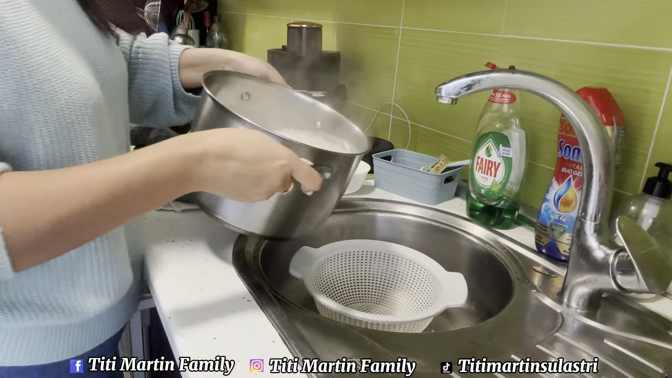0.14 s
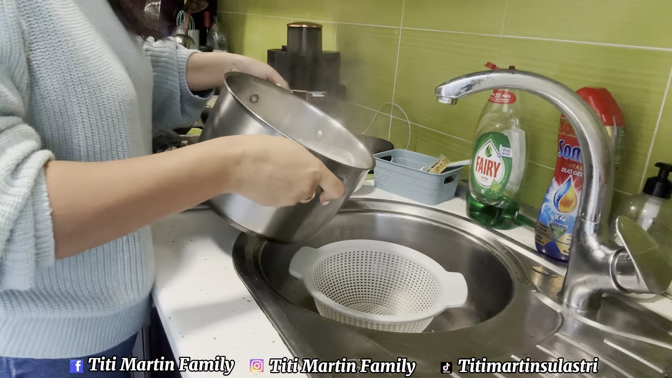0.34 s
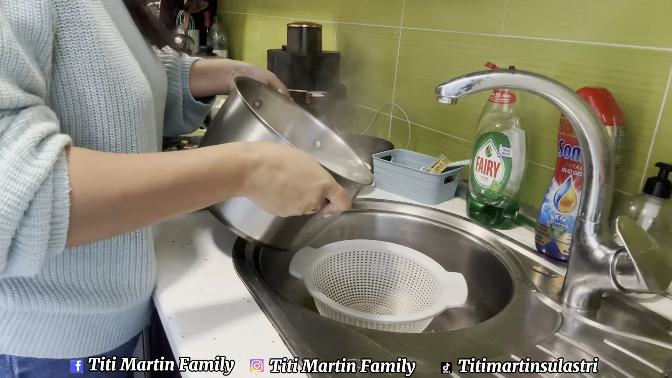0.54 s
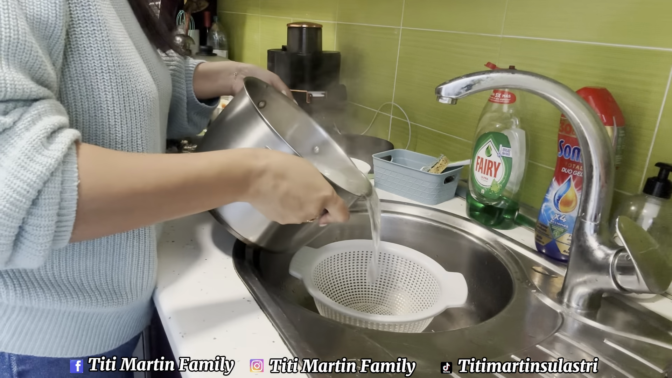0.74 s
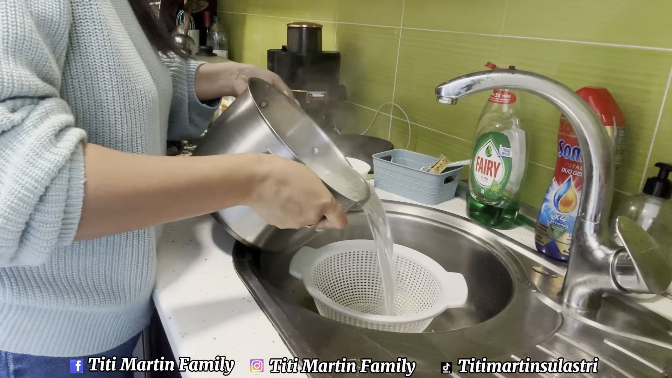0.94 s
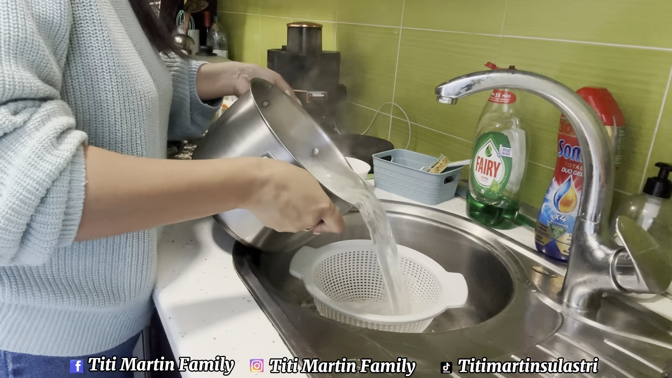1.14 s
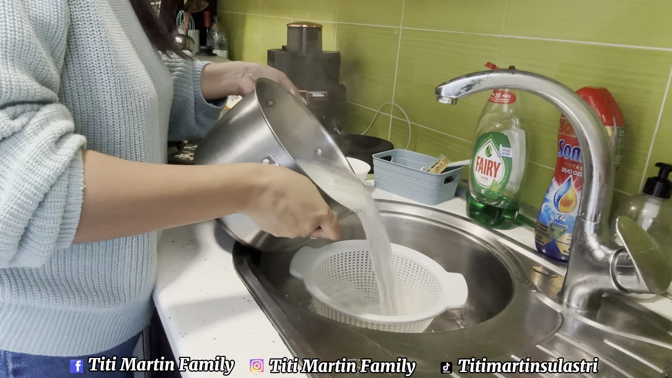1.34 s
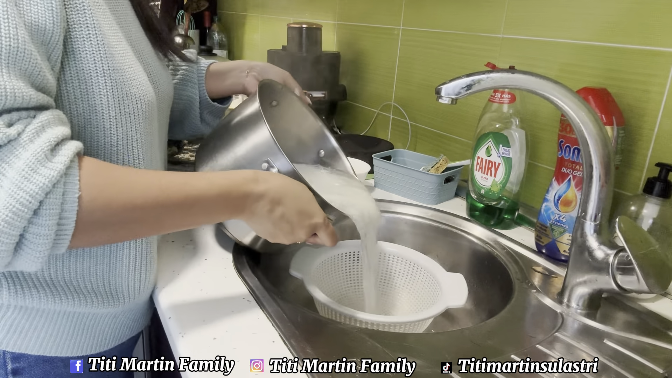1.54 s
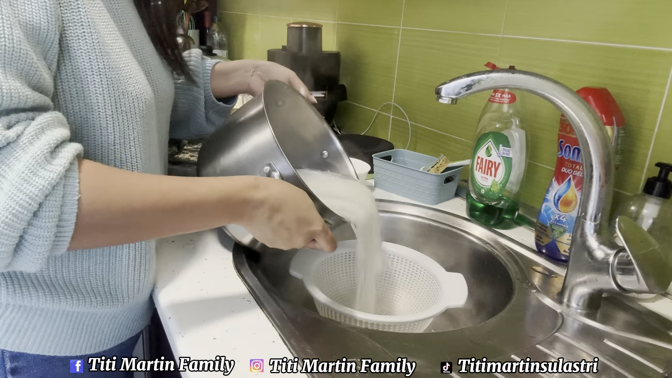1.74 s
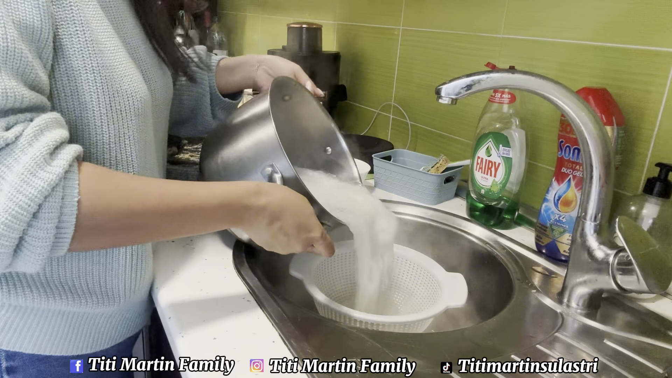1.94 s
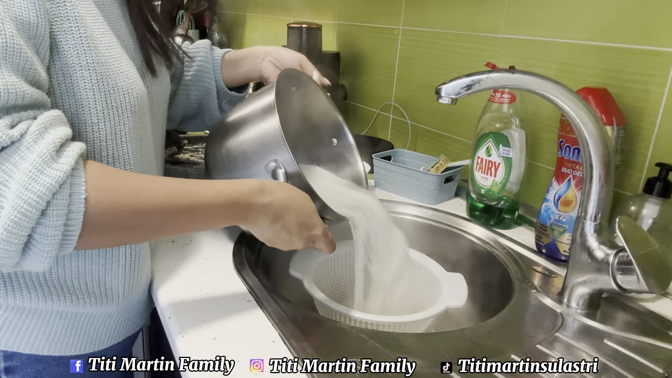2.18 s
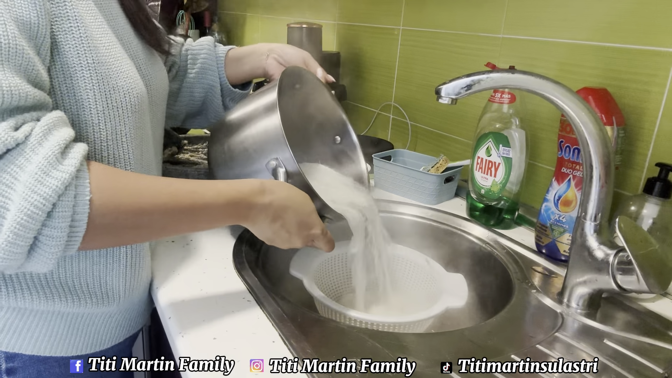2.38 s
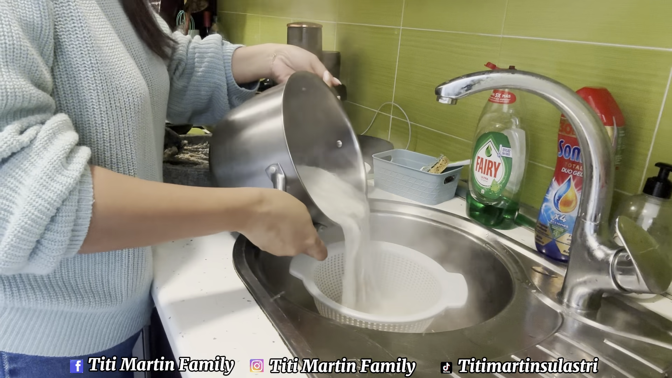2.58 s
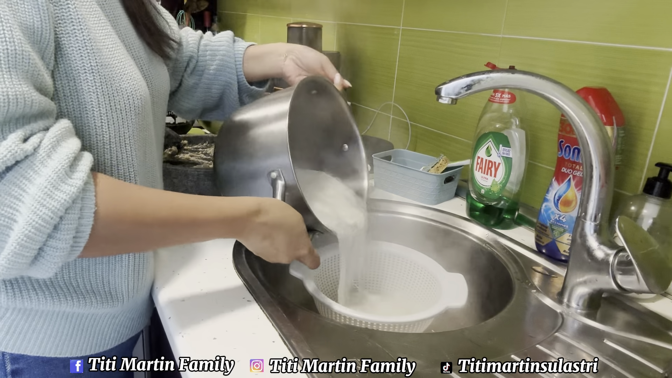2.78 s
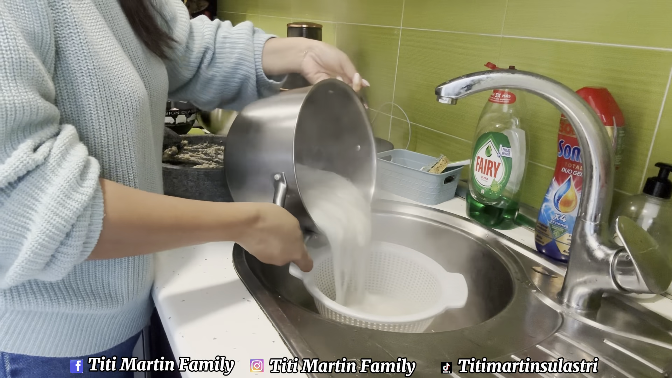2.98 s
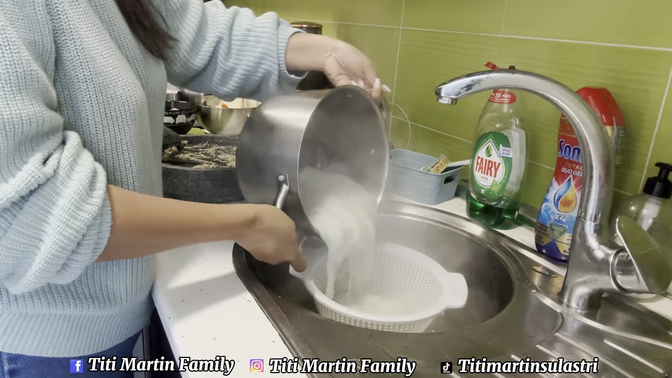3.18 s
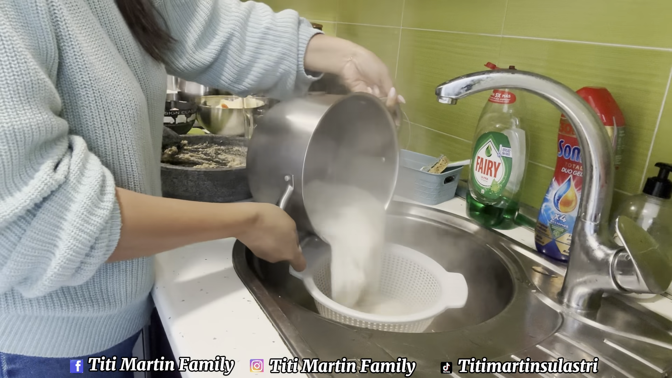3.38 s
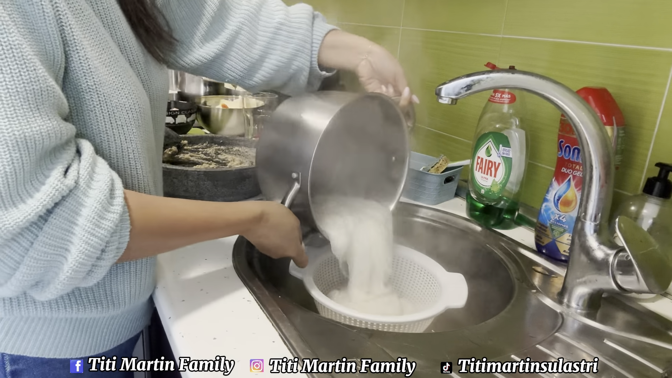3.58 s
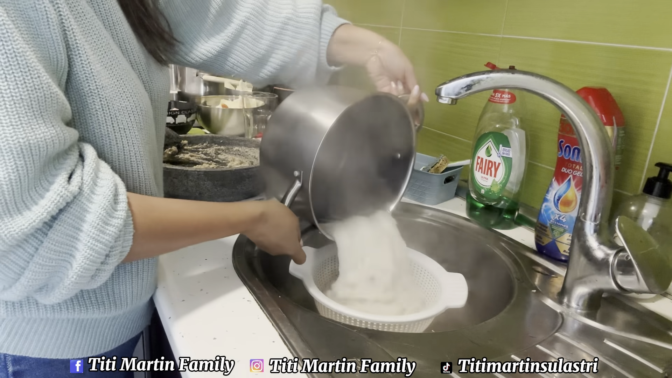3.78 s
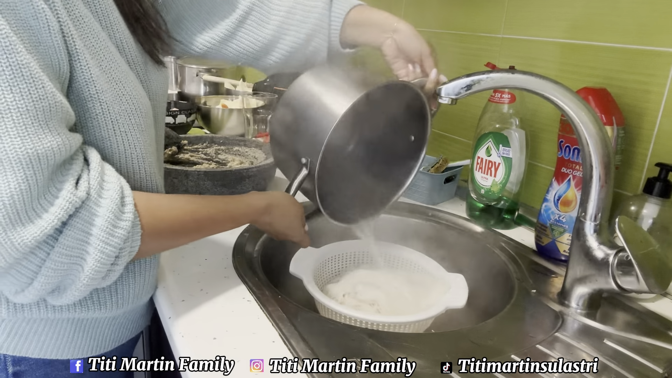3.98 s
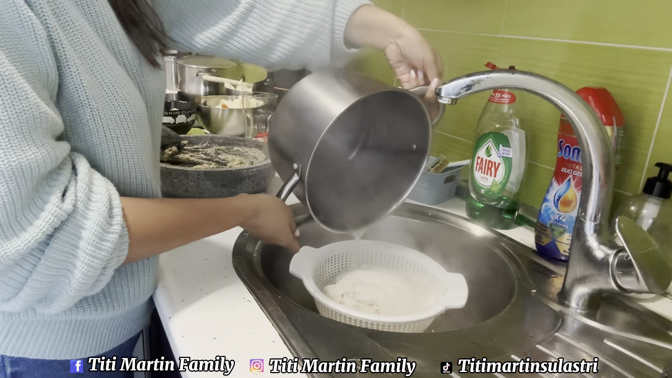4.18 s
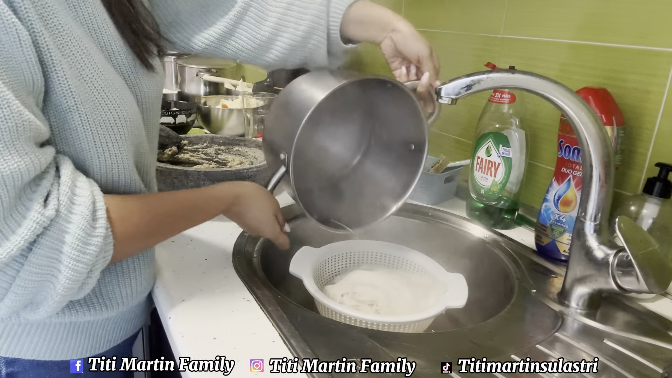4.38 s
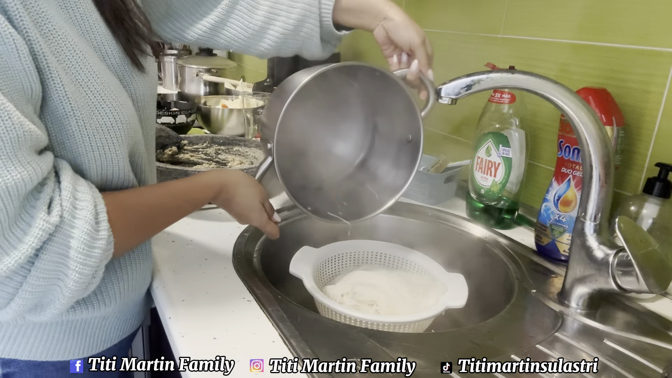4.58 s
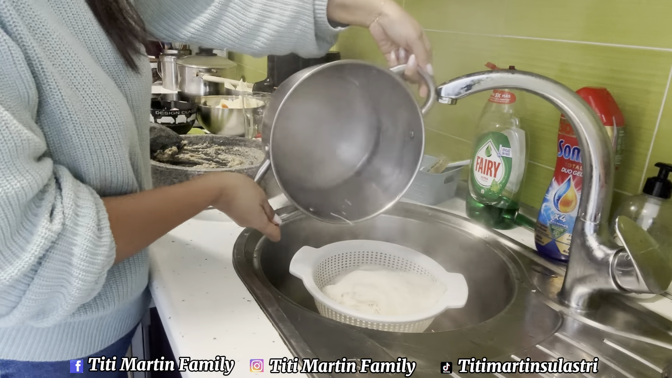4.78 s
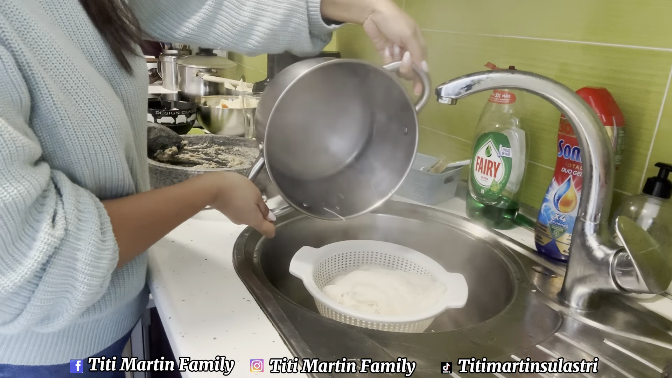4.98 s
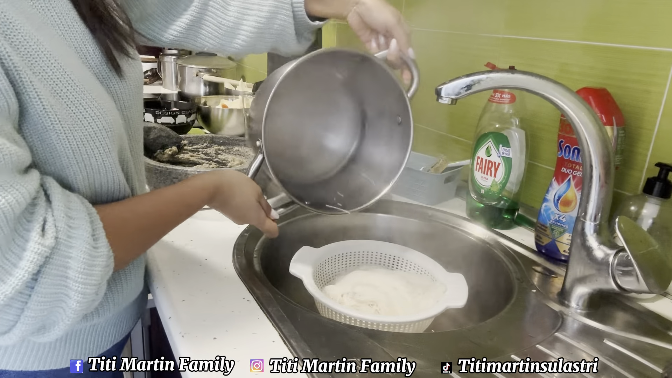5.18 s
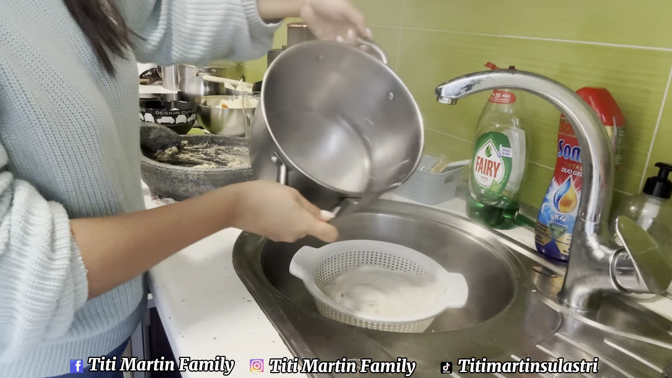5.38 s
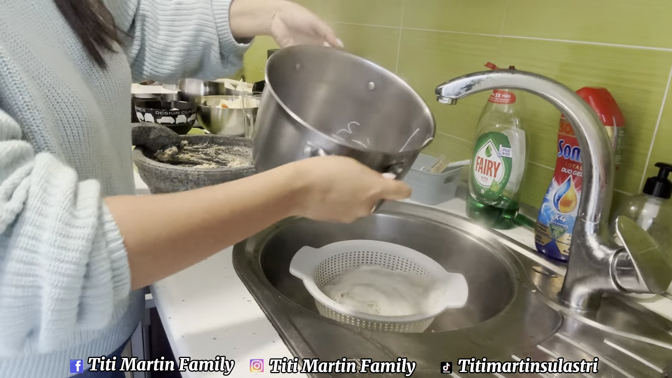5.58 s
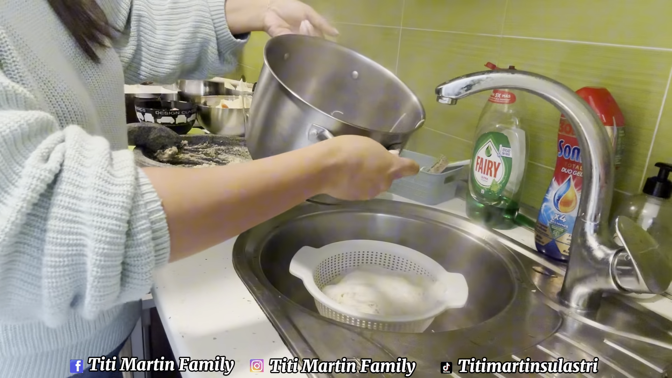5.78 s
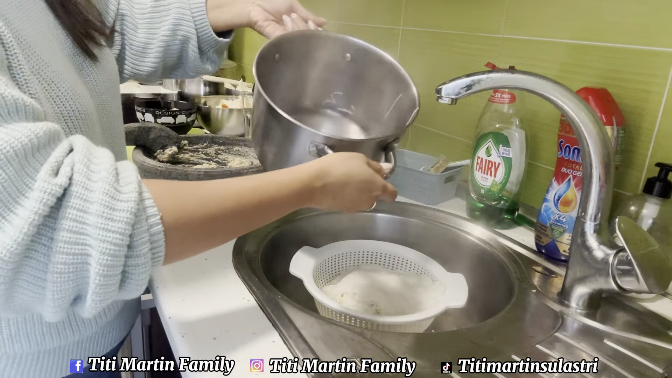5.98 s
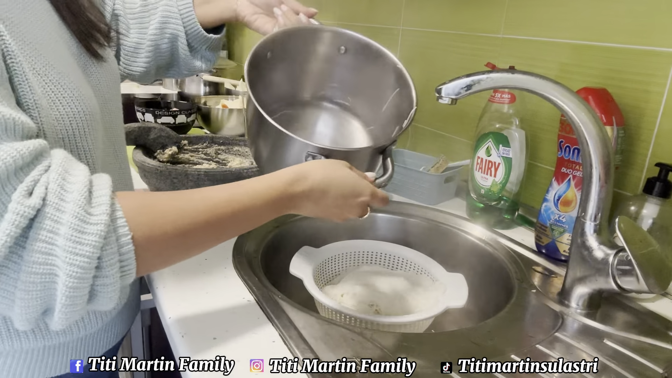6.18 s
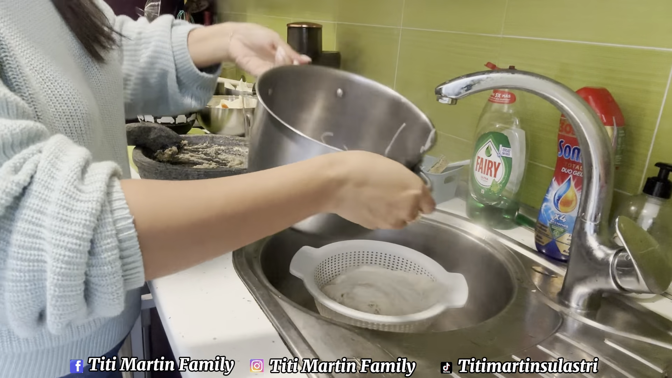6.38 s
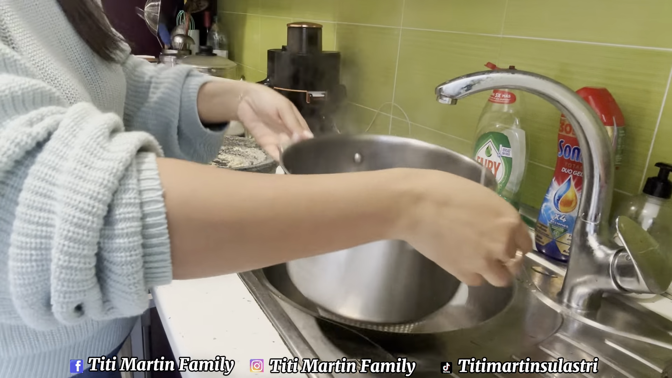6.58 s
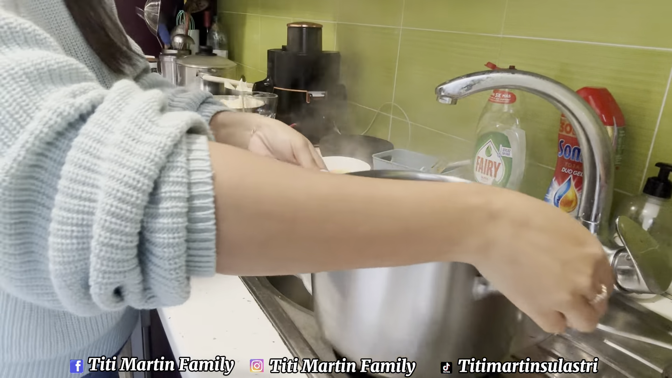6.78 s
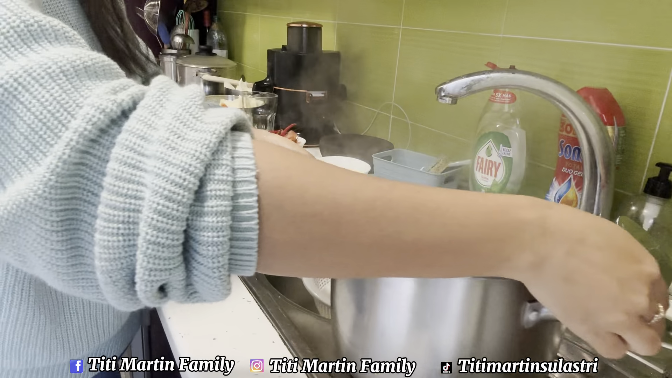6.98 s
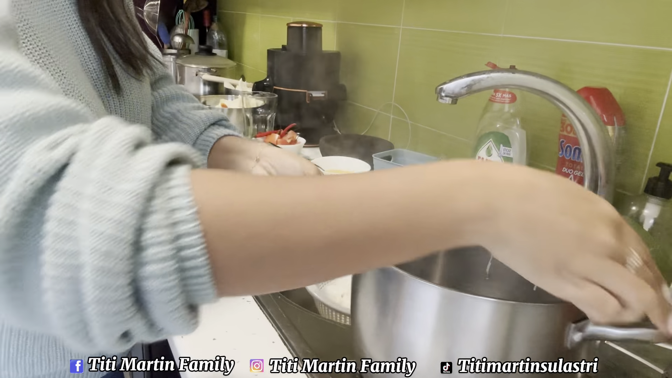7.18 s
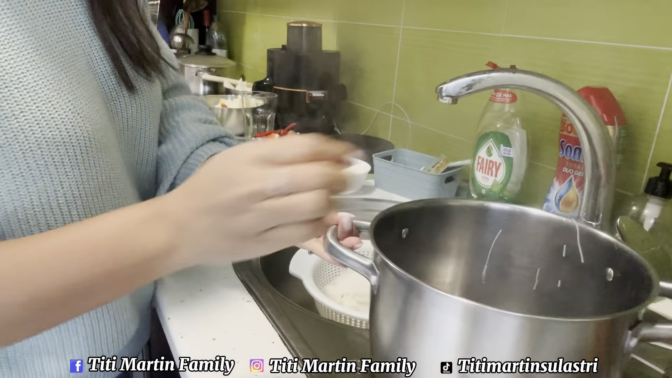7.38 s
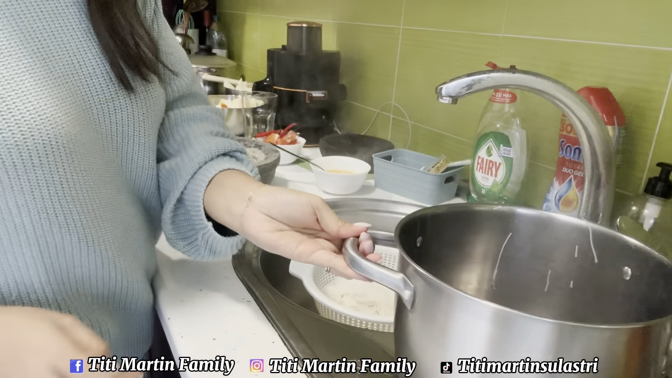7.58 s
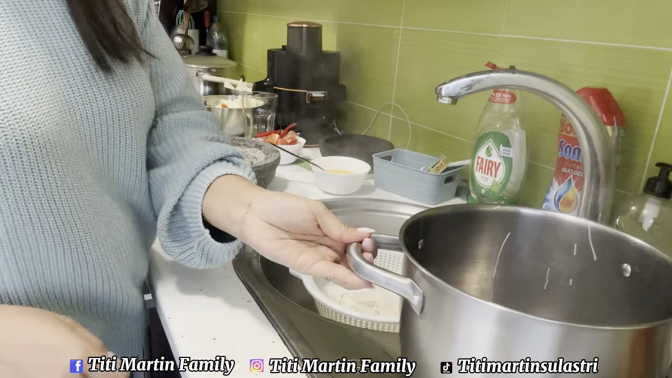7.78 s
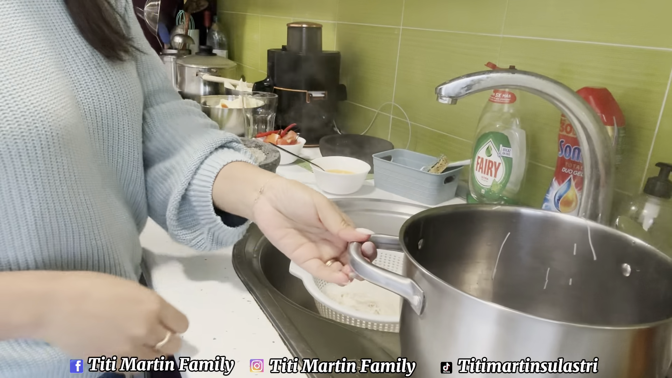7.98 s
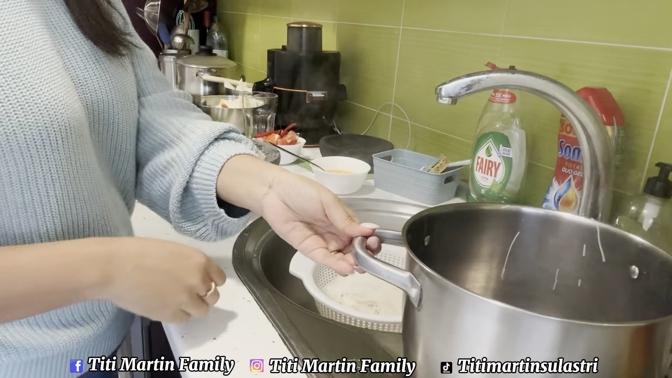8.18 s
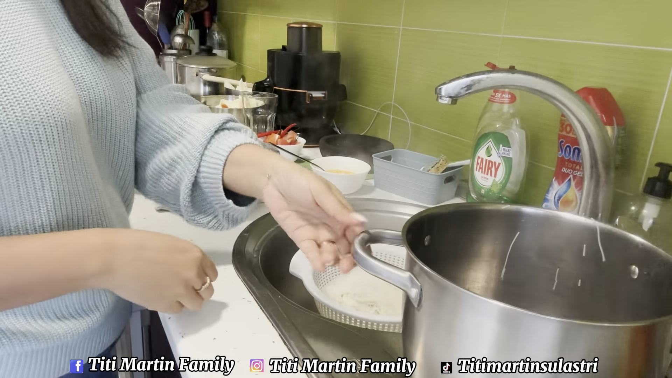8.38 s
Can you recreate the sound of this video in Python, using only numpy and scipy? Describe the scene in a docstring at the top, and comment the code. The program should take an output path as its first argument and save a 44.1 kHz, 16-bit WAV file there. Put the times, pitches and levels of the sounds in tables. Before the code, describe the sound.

In a small kitchen, hot water and noodles are tipped from a steel pot through a plastic colander into a metal sink. The pour hisses, splashes and glugs, and the hot sink buckles with dull booms. It thins to drips and near quiet, then the empty pot lands on the drainer with loud clunks, rattles and scrapes briefly. Close microphone, sounds slightly right, low room rumble.

```python
"""Hot water and noodles pour through a plastic colander into a steel sink: noise bands hiss, tiny
ringing bubbles fizz, glugs are swelling tones, splats are noise bursts and water drums on bowl modes.
The hot steel buckles with dull booms, made of struck modes and dying noise. Then the empty pot is set
down on the drainer, rocks and is nudged: knocks, tinks and a sliding grind. Rumble and a low hum fill
the small kitchen, whose echoes are feedback delays."""
import sys
import numpy as np
from scipy import signal
from scipy.fft import rfft, irfft, next_fast_len
from scipy.io import wavfile

SR = 44100
rng = np.random.default_rng(int(sys.argv[2]) if len(sys.argv) > 2 else 0)


def digitize_waveform(pressure):
    """Quantize a signal to 16-bit integers and store it at the path in sys.argv[1].

    Rows of a 2-D input are taken as channels; values are limited to [-1, 1].
    """
    field = np.atleast_2d(pressure).T
    bounded = np.clip(field, -1, 1)
    quanta = np.round(bounded * 32767).astype(np.int16)
    wavfile.write(sys.argv[1], SR, quanta)


N = 372204
POUR_START_S = 0.762

# Stream between splashes, levels relative: start_s, slosh_db (1-4 kHz), spray_db (4-13 kHz), drum_db
STREAM = [(.8, -58.5, -55, -55), (.95, -44, -54.5, -51), (1.16, -44, -49, -51), (1.32, -33.5, -46, -49.5),
          (1.45, -46, -55, -47.5), (1.7, -46, -57, -38), (1.9, -63, -59.5, -55), (2.01, -43, -48.5, -37),
          (2.09, -51, -55.5, -46), (2.2, -42.5, -45, -41.5), (2.33, -54, -52, -42),
          (2.52, -55, -60.5, -42.5), (2.74, -55.5, -66.5, -46), (2.9, -84, -65, -50.5),
          (3.3, -63, -69, -59.5), (3.42, -56, -53, -55), (3.62, -61, -66.5, -56.5), (3.86, -52, -57, -53),
          (4.2, -76, -74, -67), (4.65, -71.5, -76.5, -78), (5.25, -77, -79.5, -100),
          (5.45, -69, -72.5, -110), (6.7, -89.5, -85.5, -120)]
# Splashes, levels relative: start_s, splat_db, centre_hz, wash_db (the hiss after it)
SPLASHES = [(.764, -43, 1370, -50), (.834, -47, 7400, -48), (1.1243, -37, 3400, -59),
            (1.165, -37, 8300, -41.5), (1.294, -31, 2640, -51), (1.426, -36, 9200, -48),
            (1.474, -32, 2650, -41.5), (1.526, -26.5, 7060, -43.5), (1.594, -18, 1270, -43),
            (1.7006, -27.5, 1290, -50), (1.835, -35.5, 3700, -64), (1.96, -38, 10500, -47),
            (2.003, -23.5, 5870, -42.5), (2.105, -33.5, 1260, -53), (2.141, -23, 2750, -52),
            (2.25, -37, 1310, -46), (2.3437, -29, 6200, -35), (2.548, -39.5, 10100, -51),
            (2.669, -28, 1380, -41.5), (3.185, -60, 1790, -56.5), (3.28, -47.5, 1510, -64),
            (3.317, -40, 1310, -55), (3.388, -38.5, 2150, -54), (3.46, -34, 2300, -50.5),
            (3.5395, -41.5, 9200, -57), (3.648, -38, 4070, -52.5), (3.692, -43, 10100, -66),
            (3.722, -43, 1590, -50.5), (3.9006, -30.5, 1370, -43), (3.9935, -39, 3100, -73),
            (4.1247, -49, 9000, -55.5), (4.257, -52, 10000, -63), (4.384, -56, 2270, -74),
            (4.456, -46, 4100, -65), (4.69, -51, 7800, -75), (4.72, -62, 2400, -68),
            (4.924, -51.5, 4230, -74), (5.057, -55, 10200, -74), (5.347, -49, 2600, -56),
            (5.538, -32, 7000, -52.5), (5.999, -51, 9100, -86)]
# Ringing modes of the pot: pitch_hz, level_db (relative), t60_s
POT_MODES = [(238.5, -3, 0.17), (335, -4.5, 0.21), (430, -13.5, 0.53), (549, -9.5, 0.25), (642, 1.5, 0.081),
             (760, -12, 0.051), (1015, -10, 0.11), (1150, -11, 0.33), (1362, -8, 0.27), (1650, -25, .2),
             (2045, -8, 0.19), (2200, -25, 0.27), (2370, -5, 0.2), (2650, -21, 0.058), (3400, -14, 0.12),
             (3915, -16, 0.15), (4945, -24, 0.14), (5480, -23, 0.087)]


def from_db(db):
    """Decibels to gain."""
    return 10 ** (np.asarray(db) / 20)


def rms_one(x):
    """Scales to rms 1."""
    return x / np.sqrt(np.mean(x ** 2) + 1e-20)


def in_time(rows):
    """Turns the columns after the time column into curves, one value a sample."""
    s, *columns = np.transpose(rows)
    return [np.interp(np.arange(N) / SR, s, column) for column in columns]


def at_hz(points, hz):
    """Reads a curve over frequency on a log axis."""
    points = np.array(points)
    return np.interp(np.log(hz), np.log(points[:, 0]), points[:, 1])


def drift(rate_hz):
    """Slow random wander of spread 1: noise through two equal one-poles, made at SR / 40."""
    r = np.exp(-80 * np.pi * rate_hz / SR)
    white = rng.standard_normal(N // 40 + 2002)
    slow = signal.lfilter([1], [1, -2 * r, r * r], white)[2000:]   # the filter's start is dropped
    return np.interp(np.arange(N) / 40, np.arange(len(slow)), rms_one(slow))


def clicks(times, gains):
    """A click train over a negligible floor."""
    out = np.full(N, 1e-18)
    np.add.at(out, (np.asarray(times) * SR).astype(int), gains)
    return out


def ring(x, hz, t60):
    """Two-pole resonator: a unit click sets a sine of height 1 ringing and dying."""
    r, w = from_db(-60 / (t60 * SR)), 2 * np.pi * hz / SR
    return signal.lfilter([0, np.sin(w)], [1, -2 * r * np.cos(w), r * r], x)


def fade(x, t60):
    """Each unit click becomes a one-pole decay of height 1."""
    return signal.lfilter([1], [1, -from_db(-60 / (t60 * SR))], x)


def bands(left_lag):
    """Half-octave bands of even-density stereo noise, left later by left_lag samples: (centre Hz, noise)."""
    # Likeness of left and right: pitch_hz, likeness (0-1)
    likeness = [(30, 1), (125, 0.84), (300, 0.24), (700, 0.09), (4000, 0.06), (8000, 0.54), (14000, 0.33)]
    edges = 28 * 2 ** np.arange(0, 9.3, .5)
    white, out = rng.standard_normal((2, 2, N)), []
    for k, (low, high) in enumerate(zip(edges, edges[1:])):
        centre_hz = np.sqrt(low * high)
        sos = signal.butter(2, [low, high], "band", fs=SR, output="sos")
        mid, side = signal.sosfilt(sos, white[k % 2])
        alike = np.clip(at_hz(likeness, centre_hz), 0, 1)
        left, right = np.sqrt(1 + alike) * mid + np.sqrt(1 - alike) * side * [[1], [-1]]
        out.append((centre_hz, np.array([np.roll(left, left_lag), right])))
    return out


def patchy(bank, spectrum, patchy_db, rate_hz):
    """Coloured noise whose bands swell slightly together and mostly alone; rms 1."""
    together, out = drift(rate_hz), 0
    for hz, noise in bank:
        if spectrum[0][0] < hz < spectrum[-1][0]:
            swell_db = patchy_db * (0.13 * together + drift(rate_hz))
            out = out + from_db(at_hz(spectrum, hz) + swell_db) * noise
    return rms_one(out)


def nearness(hz, favoured_hz, slope_db):
    """Change by distance from the favoured mode, dB an octave: weaker for a positive slope, else stronger."""
    return -slope_db * np.abs(np.log2(hz / favoured_hz))


def struck(times, levels_db, modes, spread_db, favoured_hz, slope_db):
    """Every blow strikes each mode with a strength, sign and slight delay of its own."""
    chance = rng.normal(0, 1, (len(times), len(modes), 3))
    out = 0
    for k, (hz, db, t60) in enumerate(modes):
        strength, sign, delay = chance[:, k].T
        blow_db = levels_db + db + spread_db * strength + nearness(hz, favoured_hz, slope_db)
        blows = clicks(times + .004 * np.abs(delay), np.sign(sign) * from_db(blow_db))
        out = out + ring(blows, hz, t60)
    return out


def dying(bank, times, level_db, spectrum, stretch):
    """Countless sheet-metal modes act as noise dying by band; low bands swell up more slowly."""
    # Sheet-metal decay ahead of the stretch factor: pitch_hz, t60_s
    decay = [(40, 0.66), (150, 0.25), (500, 0.33), (2000, 0.35), (6000, 0.29), (13000, 0.25)]
    out = 0
    for hz, noise in bank:
        hits = clicks(times, from_db(level_db(hz) + at_hz(spectrum, hz)))
        envelope = fade(hits, stretch * at_hz(decay, hz))
        swell = np.exp(-hz * 5.9 / SR)
        out = out + noise * signal.lfilter([1 - swell], [1, -swell], envelope)
    return out


def pour():
    """Stream levels over time; every splash adds a wash that rises fast and dies away."""
    rise_s, wash_t60_s = 0.0027, 0.22
    spill_db = -10.5   # a low splash also stirs the spray, a high one the slosh
    slosh_db, spray_db, drum_db = in_time(STREAM)
    s, _, hz, wash_db = np.transpose(SPLASHES)
    rise = np.exp(-1 / (rise_s * SR))
    low = hz < 4000

    def wash(own):
        starts = clicks(s, from_db(wash_db + spill_db * ~own))
        return signal.lfilter([1 - rise], [1, -rise], fade(starts, wash_t60_s))

    slosh = np.hypot(from_db(slosh_db), wash(low))
    spray = np.hypot(from_db(spray_db), wash(~low))
    return slosh, spray, drum_db, spray_db


def hiss(bank, slosh, spray):
    """Turbulent water as patchy noise: a slowly swelling slosh under a quicker, finer spray."""
    # Colours of slosh and of spray: pitch_hz, density_db (relative, per Hz)
    slosh_colour = [(290, -49), (500, -22), (662, 0), (824, -20), (983, 1), (1110, -5), (1900, -1),
                    (3320, -3), (5500, -9), (7800, -64), (13200, -120)]
    spray_colour = [(1760, -52), (3000, -11.5), (3250, -11), (4200, -11), (6130, -0.5), (6870, -1),
                    (12500, -6.5), (15000, -28)]
    low = slosh * patchy(bank, slosh_colour, patchy_db=5.0, rate_hz=9.2)
    high = spray * from_db(4.5) * patchy(bank, spray_colour, patchy_db=2.0, rate_hz=48)
    return low + high


def bubbles(per_s, low_hz, high_hz, cycles, uneven_db):
    """Random small bubbles, each dying by 60 dB within a number of cycles; rms 1."""
    sizes = from_db(uneven_db * np.minimum(rng.exponential(1, N), 5)) * rng.choice([-1, 1], N)
    born, dealt = rng.random(N) < per_s / SR, rng.integers(0, 14, N)
    out = 0
    for k, hz in enumerate(np.geomspace(low_hz, high_hz, 14)):
        out = out + ring(sizes * born * (dealt == k) + 1e-18, hz, cycles / hz)
    return rms_one(out)


def fizz(slosh, spray):
    """Larger bubbles ring with the slosh, tiny ones with the spray."""
    low = slosh * from_db(-9) * bubbles(800, 1240, 4100, cycles=9.3, uneven_db=4.0)
    return low + spray * from_db(-1) * bubbles(1900, 6000, 13000, cycles=12.0, uneven_db=6.0)


def gurgle(drum_db):
    """Sparse, deeper bubbles that follow the drumming."""
    return from_db(drum_db - 8.5) * bubbles(70, 344, 1780, cycles=13.0, uneven_db=6.0)


def drumming(drum_db):
    """Water beats unevenly on the bowl's modes, whose balance shifts once water stands in it."""
    # Standing water: start_s, fullness (0-1)
    filling = [(0, 0), (1.9, 0), (2.35, 0.95), (8.44, 0)]
    # Modes of the wet bowl: pitch_hz, level_db (relative), t60_s, full_change_db (once water stands in it)
    bowl = [(139, 0.5, 0.045, -1), (346, -2, 0.046, -1), (484, -11, 0.12, 7.5), (649, 1, 0.041, -8.5),
            (990, -12, 0.093, -5), (1280, -29, 0.045, -17)]
    full = in_time(filling)[0]
    beating = rng.standard_normal(N) * from_db(3.5 * drift(15.6))
    stream = sum(from_db(db + wet_db * full) * ring(beating, hz, t60) for hz, db, t60, wet_db in bowl)
    return from_db(drum_db) * rms_one(stream)


def gushes():
    """Each glug swells in a few milliseconds, flutters, wobbles and creeps up in pitch, over a dull slap."""
    # Glugs as gushes land and air pockets close: start_s, level_db (relative), pitch_hz, t60_s
    glugs = [(.765, -31, 125, 0.056), (.949, -29.5, 685, 0.047), (1.27, -47, 990, .3),
             (1.343, -31.5, 134.4, 0.15), (1.38, -44, 990, .3), (1.5, -43.5, 990, 0.26),
             (1.641, -24, 332, 0.11), (1.675, -30, 280, .06), (1.71, -33, 650, 0.23),
             (1.789, -26.5, 674, 0.13), (1.978, -33, 121, 0.043), (2.038, -30, 342, .08),
             (2.105, -26, 322, 0.057), (2.219, -25, 142, 0.03), (2.3, -23.5, 633, 0.12),
             (2.384, -31, 490, 0.17), (2.502, -36, 490, 0.35), (2.583, -30, 627, 0.2),
             (2.59, -30.5, 490, 0.15), (2.735, -34, 650, 0.22), (2.892, -37.5, 484, 0.35),
             (2.977, -47, 640, 0.22), (3.025, -42, 484, 0.28), (3.05, -49, 650, 0.13),
             (3.124, -40, 481, 0.23), (3.399, -45, 137, .14), (3.471, -39, 495, 0.14),
             (3.666, -42.5, 490, .18), (3.809, -36.5, 490, .1), (3.873, -43, 476, 0.18),
             (4.009, -43, 479.5, 0.31), (4.059, -45, 490, 0.28), (4.229, -43.5, 487, .19)]
    slap_db, slap_t60_s = -10, .06
    out, t = np.zeros(N), np.arange(SR // 3) / SR
    for (s, level_db, hz, t60), white in zip(glugs, rng.standard_normal((len(glugs), 2, len(t)))):
        wobble = rms_one(signal.lfilter([1], [1, -.995], white[0]))
        flutter_db = 4 * rms_one(signal.lfilter([1], [1, -.997], white[1]))
        pitch_hz = hz * (1 + 0.23 * t + 0.026 * wobble)
        tone = np.sin(2 * np.pi * np.cumsum(pitch_hz) / SR) * from_db(flutter_db)
        sos = signal.butter(2, [hz / 2, hz * 2], "band", fs=SR, output="sos")
        slap = from_db(slap_db - 60 * t / slap_t60_s) * rms_one(signal.sosfilt(sos, white[1]))
        glug = (1 - np.exp(-t / 0.0026)) * from_db(-60 * t / t60) * tone
        out[int(s * SR):int(s * SR) + len(t)] += from_db(level_db + 2.0) * (glug + slap)
    return out


def drips(spray_db):
    """Small splats at random moments and pitches, their level following the spray."""
    per_s, over_spray_db, spread_db = 13, 17, 3.5
    span_s = STREAM[-1][0] - POUR_START_S
    chance = rng.random((int(per_s * span_s), 3))
    s = POUR_START_S + chance[:, 0] * span_s
    level_db = spray_db[(s * SR).astype(int)] + over_spray_db + spread_db * (2 * chance[:, 1] - 1)
    return list(zip(s, level_db, 1500 * 7 ** chance[:, 2]))


def splats(rows):
    """Each splat is a sharp first tick and a burst of noise around its own pitch."""
    burst_t60_s, tick_db, tick_t60_s = 0.056, -6.5, 0.0056
    out, length = np.zeros(N), SR // 8
    t = np.arange(length) / SR
    for (s, level_db, hz), white in zip(rows, rng.standard_normal((len(rows), length))):
        narrow = signal.butter(2, [hz / 1.135, min(hz * 1.161, 16000)], "band", fs=SR, output="sos")
        burst = rms_one(signal.sosfilt(narrow, white)) * from_db(level_db - 3 - 60 * t / burst_t60_s)
        wide = signal.butter(1, [hz / 2.5, min(hz * 3, 16000)], "band", fs=SR, output="sos")
        tick = rms_one(signal.sosfilt(wide, white)) * from_db(level_db + tick_db - 60 * t / tick_t60_s)
        out[int(s * SR):int(s * SR) + length] += burst + tick
    return out


def buckles(bank):
    """The hot sheet snaps over: struck modes ring, one low mode swells up, a rumble dies away."""
    # Bowl buckling in the heat, levels relative: start_s, snap_db, thud_db (under 110 Hz)
    buckle_rows = [(1.591, -12.5, -40), (1.699, -17, -43), (2.672, -8, -29.5), (3.321, -26, -42)]
    # Modes of the buckling sheet: pitch_hz, level_db (relative), t60_s
    sheet_modes = [(134, -12.5, 0.21), (205, -18, 0.11), (323, 9, 0.044), (344.6, -13, 0.14),
                   (490, -28, 0.43), (650, -1.5, 0.06), (780, -46, .1), (1069, -10, 0.033),
                   (1470, -27, 0.11), (1740, -29, 0.13)]
    # Colour of the rumble: pitch_hz, density_db (relative, per Hz)
    boom_colour = [(18, -36), (30, -3), (64, 6), (236, -10), (301, -8.5), (524, -9), (572, -16.5),
                   (639, -12.5), (932, -35), (6000, -81), (7800, -84), (13200, -120)]
    s, snap_db, thud_db = np.transpose(buckle_rows)
    snap = struck(s, snap_db - 6.0, sheet_modes, spread_db=-1.0, favoured_hz=310, slope_db=-1.5)
    kick = struck(s, snap_db - 17.5, [(313.5, 0, 0.014)], spread_db=-11.5, favoured_hz=315, slope_db=0)
    swelling = 0.1 * ring(kick, 337, 0.01)   # driven near its own pitch, the mode grows before it dies
    rumble_db = lambda hz: thud_db + 26.0 if hz < 110 else snap_db + 9.5
    rumble = dying(bank, s, rumble_db, boom_colour, stretch=0.93)
    dull = signal.butter(1, 1500, fs=SR, output="sos")
    return rumble, swelling + signal.sosfilt(dull, snap)


def knocks(bank):
    """Rattling drainer, a crack at each contact, a thicket of sheet modes, worktop thud and pot modes."""
    # Pot on the drainer, levels relative: start_s, thud_db (under 150 Hz), body_db (to 1.5 kHz),
    # clatter_db (to 6 kHz), sizzle_db (above), ring_db (pot), favoured_hz
    contacts = [(6.825, -6.5, -5, -22, -26, -14, 549), (6.925, -11, -9, -26.5, -30.5, -22, 335),
                (7.006, -10.5, -10, -27, -30, -21.5, 760), (7.098, -42, -20.5, -35, -42.5, -29, 430),
                (7.139, -23, -25, -43, -50, -24.5, 335), (7.178, -24, -23.5, -41.5, -45, -28.5, 430),
                (7.265, -41, -25.5, -32.5, -29, -44, 1150), (7.329, -42, -34, -47.5, -56, -30.5, 430),
                (7.516, -30, -23.5, -49, -55, -31, 430), (7.582, -19.5, -10, -27, -34.5, -26, 335),
                (7.921, -56, -46.5, -55.5, -51, -52, 549), (8.072, -23.5, -19.5, -34, -41.5, -36, 549)]
    # The base touches again, softly; change of level: thud_db, body_db, clatter_db, sizzle_db, ring_db
    rebound_db = [-3.5, -24.5, -32.5, -31.5, -3.5]
    rebound_s = .023
    # Colour of the rattle: pitch_hz, density_db (relative, per Hz)
    rattle_colour = [(18, -31), (30, -2), (81, -5), (288, -27.5), (337, -11.5), (629, -23), (905, -23),
                     (1170, -26.5), (1520, -29), (1970, -28.5), (9390, -43), (13200, -45.5), (15000, -74)]
    # Modes of the worktop: pitch_hz, level_db (relative), t60_s
    worktop = [(45.5, -10, 0.28), (77.7, -1, 0.16), (119, 1, 0.075)]
    rebounds = np.add(contacts, [rebound_s, *rebound_db, 0])
    s, thud_db, body_db, clatter_db, sizzle_db, ring_db, favoured_hz = np.vstack([contacts, rebounds]).T

    def level_db(hz):
        if hz < 150:
            return thud_db + 11.0
        if hz < 1500:
            return body_db + 22.0
        return clatter_db + 38.5 if hz < 6000 else sizzle_db + 43.5

    rattle = from_db(1.26 * drift(63)) * dying(bank, s, level_db, rattle_colour, stretch=0.93)
    soft_noise = signal.lfilter([.6], [1, -.4], rng.standard_normal(N))
    crack = soft_noise * fade(clicks(s, from_db(clatter_db + 5.0)), 0.014)
    pitches = np.geomspace(600, 7000, 60) * rng.uniform(0.96, 1.04, 60)
    sheet = [(hz, -4 * np.log2(hz / 600), .14) for hz in pitches]
    thicket = struck(s, clatter_db - 2.0, sheet, spread_db=5.0, favoured_hz=favoured_hz, slope_db=0.5)
    # the worktop answers about 10 ms late
    thud = struck(s + 0.01014, thud_db - 3.5, worktop, spread_db=2.5, favoured_hz=75.6, slope_db=-4.5)
    pot = struck(s, ring_db, POT_MODES, spread_db=2.5, favoured_hz=favoured_hz, slope_db=5.0)
    return rattle, pot + thicket + crack + thud


def tinks():
    """Single pot modes ring out clearly, each the mode nearest to the wanted pitch."""
    # Tinks: start_s, level_db (relative), pitch_hz
    tink_rows = [(5.35, -54, 2370), (5.361, -55, 2650), (5.56, -59, 2370), (5.64, -59.5, 2370),
                 (5.79, -64, 2370), (6.827, -14.5, 1150), (6.828, -15, 549), (6.931, -24, 1150),
                 (6.938, -22, 335), (7.009, -16, 760), (7.009, -24, 1150), (7.267, -33, 1150),
                 (7.271, -31, 430), (7.267, -26, 4945), (7.272, -30, 3400), (7.587, -15, 335),
                 (7.92, -36.5, 2650), (7.921, -46.5, 5480), (8.073, -37, 2370)]
    out = 0
    for s, db, wanted_hz in tink_rows:
        hz, _, t60 = min(POT_MODES, key=lambda mode: abs(mode[0] - wanted_hz))
        out = out + ring(clicks([s], from_db(db)), hz, t60)
    return out


def slide():
    """Friction under the dragged base: a grind and a rasp, with one low mode humming from the same noise."""
    # Pot dragged, levels relative: start_s, hum_db (of its base), grind_db, rasp_db
    drag = [(7.3, -41, -53, -30.5), (7.394, -43, -45.5, -45.5), (7.424, -36, -38.5, -42),
            (7.476, -49, -37.5, -42.5), (7.538, -35, -33.5, -45), (7.576, -29, -28, -33),
            (7.58, -43, -32, -23)]
    hum_db, grind_db, rasp_db = in_time(drag)
    t = np.arange(N) / SR
    moving = np.clip(np.minimum(t - drag[0][0], drag[-1][0] - t) / 0.0067, 0, 1)   # short fades at both ends
    friction = rng.standard_normal(N) * from_db(3 * drift(60))

    def band(low, high):
        sos = signal.butter(2, [low, high], "band", fs=SR, output="sos")
        return rms_one(signal.sosfilt(sos, friction))

    hum = from_db(hum_db + 1.5) * rms_one(ring(friction, 430.3, 0.13))
    grind = from_db(grind_db - 2.0) * band(290, 1830)
    rasp = from_db(rasp_db - 4.5) * band(820, 8700)
    return moving * (hum + grind + rasp)


def placed(x, left_db, left_lag):
    """A source right of centre: later on the left by left_lag samples and, above the bass, quieter there."""
    centred_hz = 109   # bass below this is about as strong on both sides
    bass = signal.sosfilt(signal.butter(1, centred_hz, fs=SR, output="sos"), x)
    return np.array([np.roll(bass + from_db(left_db) * (x - bass), left_lag), x])


def kitchen(x):
    """Room echoes: eight feedback delays a side, duller on every round."""
    t60_s, wall_cut_hz = 0.29, 14200
    size = next_fast_len(N + SR)
    z = np.exp(-2j * np.pi * np.arange(size // 2 + 1) / size)   # a delay of one sample
    dull = np.exp(-2 * np.pi * wall_cut_hz / SR)
    sides = np.zeros((2, len(z)), complex)
    for k, lag in enumerate((rng.uniform(0.01, 0.032, 16) * SR).astype(int)):
        loop = from_db(-60 * lag / SR / t60_s) * (1 - dull) / (1 - dull * z) * z ** lag
        sides[k % 2] += loop / (1 - loop) * (-1) ** (k // 2)
    return irfft(sides * rfft(x, size), size)[:, :N]


def room_tone(bank):
    """Appliance rumble as patchy noise, with two hum lines wavering in level."""
    # Colour of the rumble: pitch_hz, density_db (relative, per Hz)
    tone_colour = [(15, -34), (25, -2.5), (54, 0.5), (154, -14.5), (309, -11.5), (354, -20), (394, -13.5),
                   (488, -16.5), (655, -16.5), (1760, -45.5), (2300, -43), (9270, -43.5), (15000, -55)]
    # Rumble over time: start_s, level_db
    tone_level = [(0, -52.5), (.75, -55), (1.5, -47), (3.2, -50.5), (4.3, -52.5), (6.8, -50.5), (8.44, -49)]
    # Hum lines: pitch_hz, level_db (rms ahead of the waver)
    hum_lines = [(49, -88), (392, -66.5)]
    t, waver_db, hum = np.arange(N) / SR, 2.5, 0
    for hz, db in hum_lines:
        hum = hum + np.sqrt(2) * from_db(db + waver_db * drift(11.0)) * np.sin(2 * np.pi * hz * t)
    rumble = from_db(in_time(tone_level)[0]) * patchy(bank, tone_colour, patchy_db=1.4, rate_hz=4.5)
    return rumble + hum


def scene():
    """Mixes water and sink, pot, kitchen echoes and room tone."""
    slosh, spray, drum_db, spray_db = pour()
    wet = np.arange(N) >= POUR_START_S * SR   # the stream is silent before the pour
    water, metal = bands(left_lag=4), bands(left_lag=10)
    boom, snap = buckles(water)
    drops = splats([row[:3] for row in SPLASHES] + drips(spray_db))
    stream = wet * (fizz(slosh, spray) + gurgle(drum_db) + drumming(drum_db))
    sink = stream + gushes() + drops + snap
    rattle, pot = knocks(metal)
    pot = pot + tinks() + slide()
    direct = placed(sink, left_db=-4.0, left_lag=4) + placed(pot, left_db=-5.5, left_lag=10)
    wide = (wet * hiss(water, slosh, spray) + boom + rattle) * from_db([[-1.1], [.9]])   # leans right
    # little bass goes to the echoes, so it stays alike on both sides
    thin = signal.sosfilt(signal.butter(2, 160, "high", fs=SR, output="sos"), sink + pot)
    return direct + wide + from_db(-12.5) * kitchen(thin) + room_tone(metal)


def record(dry):
    """Deep bass is cut, peaks are rounded, treble rolls off, the top is cut."""
    dry = signal.sosfilt(signal.butter(6, 38, "high", fs=SR, output="sos"), dry)
    rounded = 1.104 * np.tanh(dry / 1.502)
    soft = signal.sosfilt(signal.butter(10, 13600, fs=SR, output="sos"), rounded)
    return signal.sosfilt(signal.cheby2(12, 70, 15800, fs=SR, output="sos"), soft)


dry = scene()
out = record(dry)
digitize_waveform(out)
```